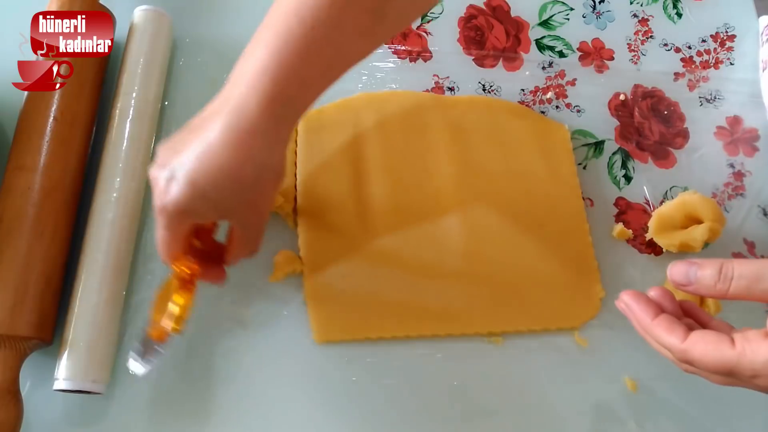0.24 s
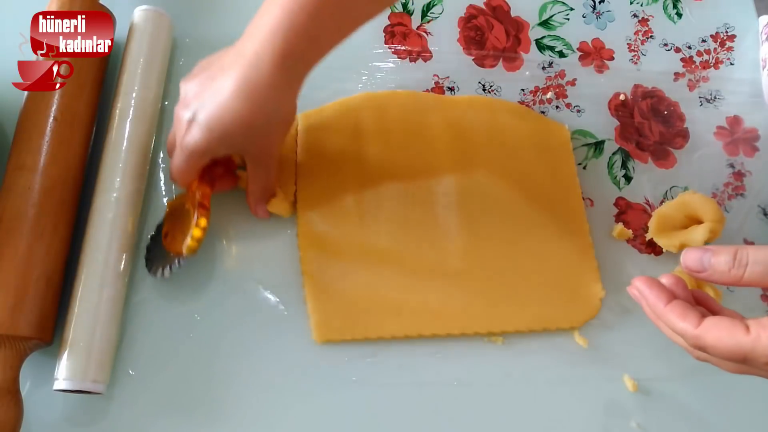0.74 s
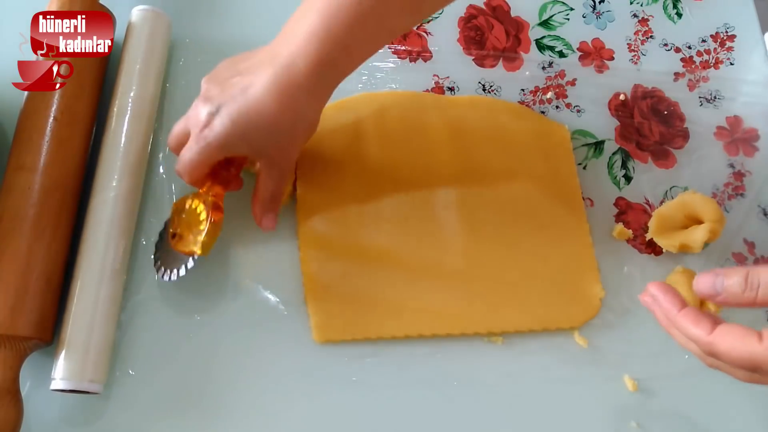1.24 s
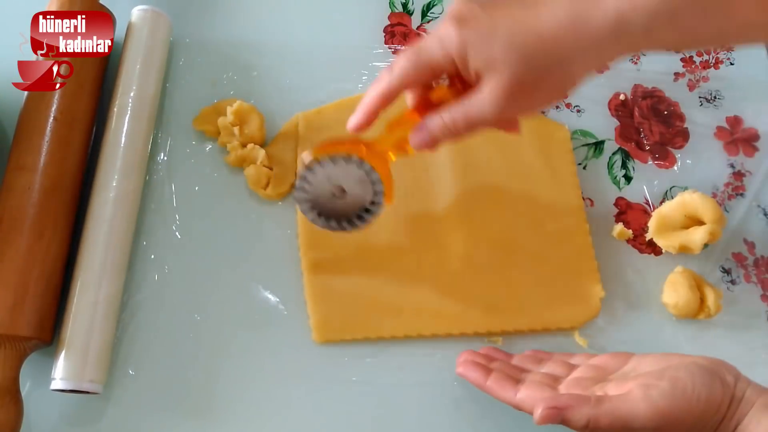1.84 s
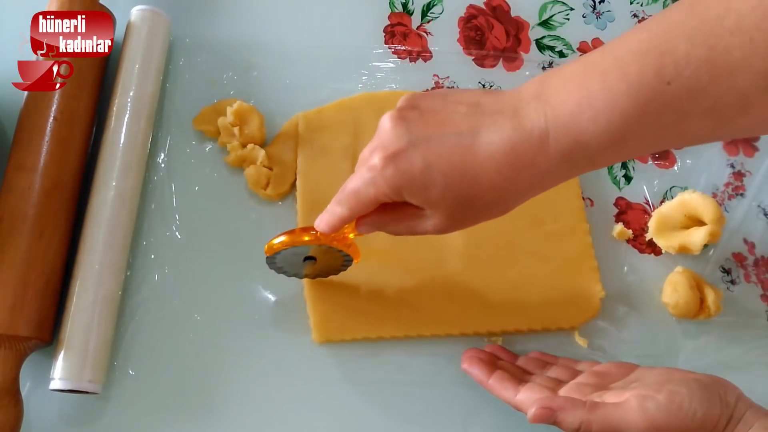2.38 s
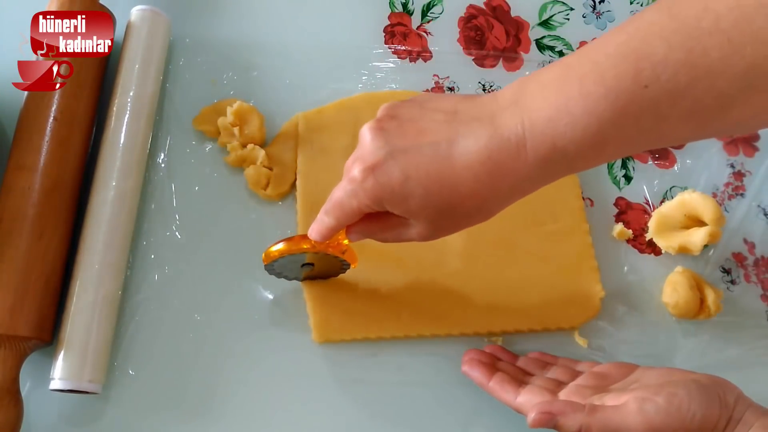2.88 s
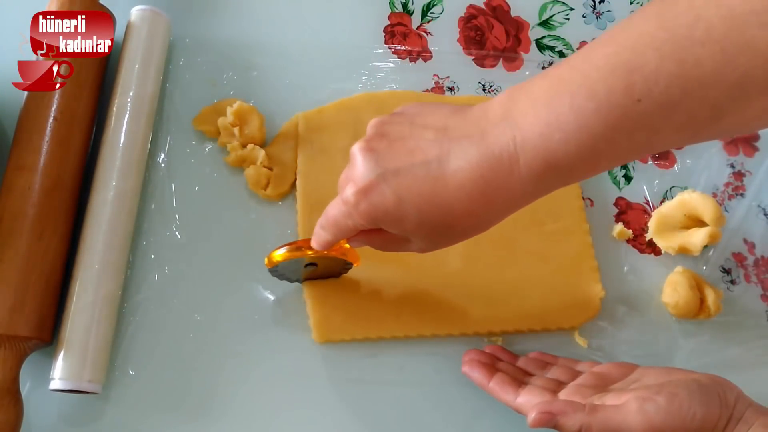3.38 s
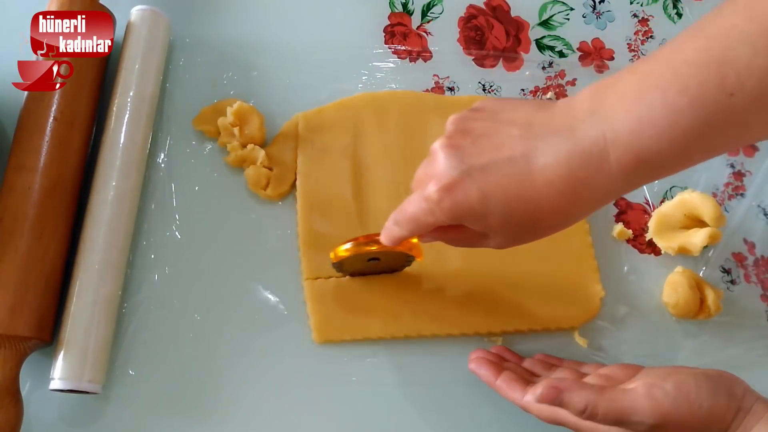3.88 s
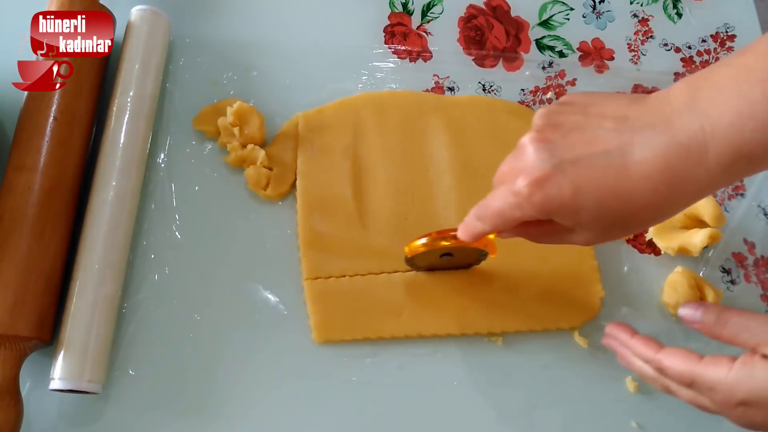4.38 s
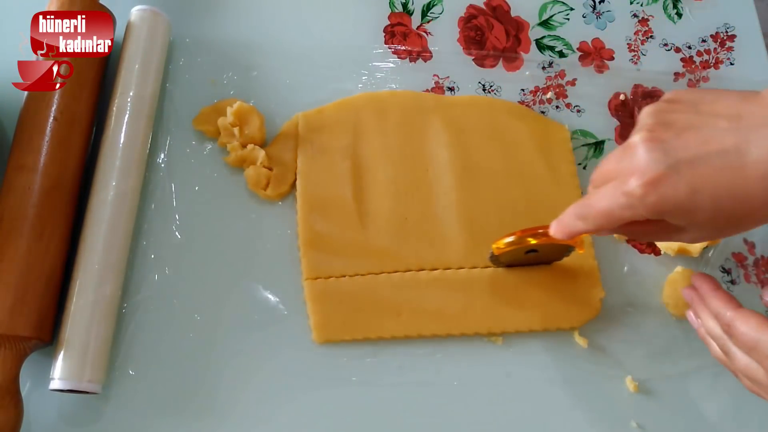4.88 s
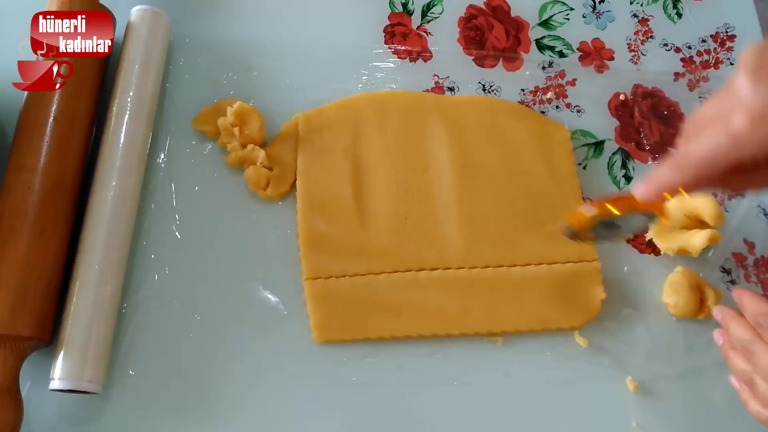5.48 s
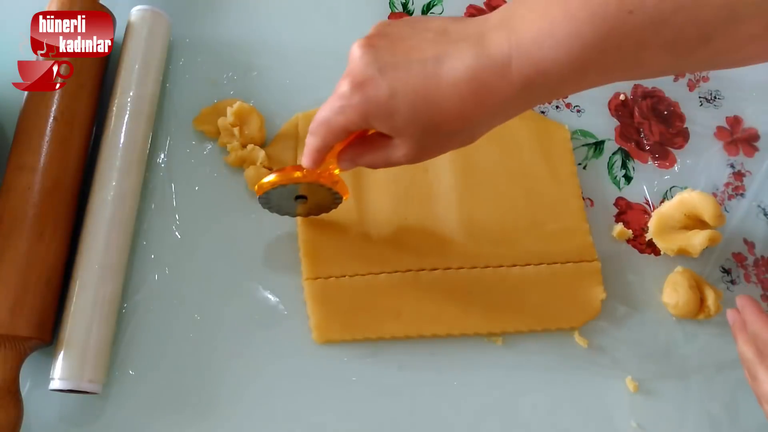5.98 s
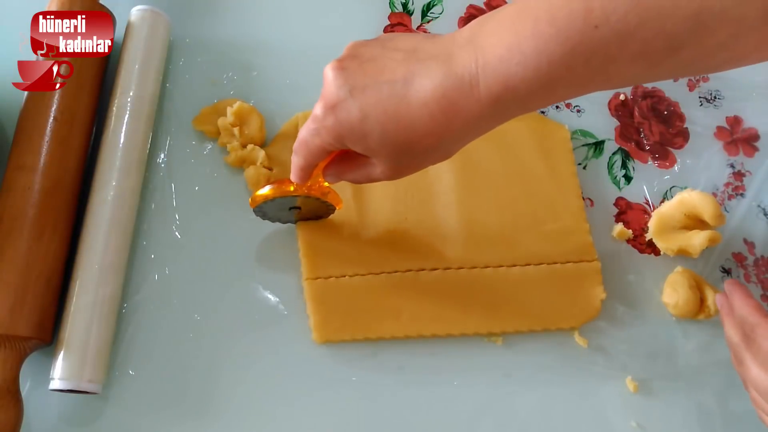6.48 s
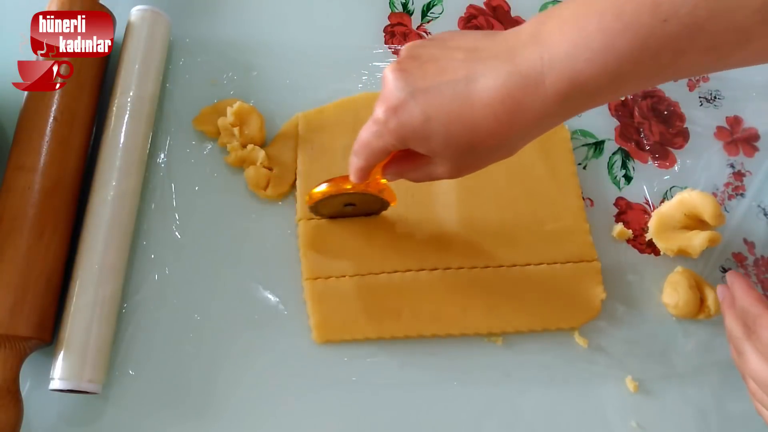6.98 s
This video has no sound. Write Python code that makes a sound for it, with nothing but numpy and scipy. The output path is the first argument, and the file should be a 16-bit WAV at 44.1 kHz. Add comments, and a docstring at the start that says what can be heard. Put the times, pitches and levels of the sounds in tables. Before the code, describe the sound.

Close stereo microphones in a small tiled kitchen, with short bright echoes, steady soft hiss and faint distant rumble. At 0 s a rapid burst of hard plastic and steel clacks hits a glass table, with a low thud dying away and a tick at 0.15. From 0.4 to 1.3 come soft table bumps, small loose-wheel rattles and faint grainy finger sweeps over dough, with a firmer clack at 1.29. Loud ringing clacks strike at 1.5 and 1.98, with lesser ones between; a very faint thin metallic ring lingers until 2.7. Light ticks fall at 2.1, 2.8 and 3.16. From about 3.45 to 5.4 the wheel rolls through dough in quiet, pulsing rough squeaks and soft hiss. At 5.55 a stronger short scrape joins a cluster of crisp ticks, more at 5.77. Sparse faint ticks follow, then barely audible rolling from 6.9 to the end.

```python
"""Pastry wheel on a glass table

A pastry cutter with a loose fluted steel wheel and a plastic handle is handled over a glass kitchen table.
Clacks and ticks are short bursts of noise through the handle's pitches; wheel and table ring as fading sines.
Fingers sweep dough aside and the wheel rolls flute by flute through the sheet: filtered, swelling noise.
A small tiled room, faint tones, a distant rumble and a steady background hiss surround it."""
import sys
import numpy as np
from scipy import signal
from scipy.fft import rfft, irfft, next_fast_len
from scipy.io import wavfile
from scipy.ndimage import uniform_filter1d

SR = 44100
rng = np.random.default_rng(int(sys.argv[2]) if len(sys.argv) > 2 else 0)


def materialize(psi):
    """Save the field psi as 16-bit PCM at rate SR to the path in sys.argv[1].

    A 1-D psi becomes a single channel; in a 2-D psi each row is a channel.
    """
    bounded = np.clip(np.atleast_2d(psi).T, -1, 1)
    quanta = np.round(bounded * 32767).astype(np.int16)
    wavfile.write(sys.argv[1], SR, quanta)


N = 319284
T = np.arange(N) / SR  # time of every sample, s


def undb(db):
    """Turn decibels into a plain multiplier."""
    return 10 ** (np.asarray(db, float) / 20)


def unit(x):
    """Scale to an average (rms) level of 1."""
    return x / np.sqrt(np.mean(x ** 2) + 1e-30)


def peak(x):
    """Scale so that the highest peak is 1."""
    return x / np.max(np.abs(x))


def band(x, lo_hz, hi_hz, order=2):
    """Keep the pitches between two limits (Butterworth band-pass along the last axis)."""
    limits = [lo_hz, min(hi_hz, .45 * SR)]
    return signal.sosfilt(signal.butter(order, limits, "band", fs=SR, output="sos"), x)


def ring(x, hz, t60):
    """One mode: a unit blow starts a unit sine that falls 60 dB in t60 seconds."""
    r = np.exp(-np.log(1000) / (t60 * SR))
    w = 2 * np.pi * hz / SR
    return signal.lfilter([0, np.sin(w)], [1, -2 * r * np.cos(w), r * r], x)


def colour(x, table, share=1):
    """Filter by (Hz, dB) points, with the dB multiplied by share."""
    hz, db = np.transpose(table)
    size = next_fast_len(N)
    f = np.maximum(np.arange(size // 2 + 1) * SR / size, 1)
    gain_db = share * np.interp(np.log(f), np.log(hz), db)
    return irfft(rfft(x, size) * undb(gain_db), size)[..., :N]


def walk(rate):
    """Wandering random values: each held 1 / rate s, then smoothed twice; spread near 1."""
    hold = int(SR / rate)
    steps = np.repeat(rng.standard_normal(N // hold + 1), hold)
    return 1.3 * uniform_filter1d(uniform_filter1d(steps, hold), hold)[:N]


def add(out, x, s):
    """Mix x in from time s, dropping whatever falls outside."""
    i = int(s * SR)
    x = x[..., max(-i, 0):N - i]
    out[..., max(i, 0):max(i, 0) + x.shape[-1]] += x


def curve(table, column, outside):
    """Join one column of a table by straight lines over time."""
    rows = np.array(table)
    return np.interp(T, rows[:, 0], rows[:, column], left=outside, right=outside)


# low band, before it wanders: first a blow's low tail dying away, later distant rumble:
# time_s, level_db
LOW_LEVEL = [(0.0, -46.5), (0.2, -66.5), (0.58, -63.5), (1.2, -69), (2.8, -74), (3.99, -67), (5.16, -70),
             (6.25, -72), (6.63, -68.5), (7.24, -67)]
# middle band: the first row is the blow's tail dying away, the later ones are distant rumble:
# centre_s, level_db, half_length_s
MID_SWELLS = [(0.0, -61, 0.13), (0.794, -72, 0.47), (2.156, -68, 0.28), (4.68, -65.5, 0.23),
              (5.595, -71.5, 0.36), (6.7, -72, 0.33)]
MID_FLOOR_DB = -91  # base level of the middle band between swells


def rumble():
    """A blow's low tail, then distant rumble: two wandering noise bands, partly shared by both ports."""
    shared, own = rng.standard_normal(N), rng.standard_normal((2, N))
    low = unit(band(shared + 1.2 * own, 34, 180))
    mid = unit(band(.3 * shared + own, 260, 440))
    mid = mid + .35 * unit(band(own, 450, 1000, order=1))
    low_db, mid_db = 1.5 * walk(8), 1.5 * walk(7)
    swells = undb(MID_FLOOR_DB)
    for s, db, half in MID_SWELLS:
        swells = swells + undb(db) * np.exp(-((T - s) / half) ** 2)
    return low * undb(curve(LOW_LEVEL, 1, None) + low_db) + mid * swells * undb(mid_db)


LEAD_IN_S, LEAD_IN_DB = 0.0065, -28  # a faint lead-in of noise before each knock


def knock(db, hz, dull_db, hollow_db, bright_db, ms, pan_db, snap=0):
    """A chatter of contacts sounds the plastic handle; both ports, with a faint lead-in of noise."""
    t = np.arange(2048) / SR - LEAD_IN_S  # 0 at the knock
    tau = np.clip(ms, .3, 20) / 1000
    after = np.maximum(t, 0)
    shape = (1 - np.exp(-after / (.5 * tau))) * np.exp(-after / tau)
    shape += undb(LEAD_IN_DB) * np.exp(-np.abs(t) / tau)
    noise = rng.standard_normal((4, len(t)))
    # reflections off the glass make the chatter differ between the ports
    chatter = (noise[0] + .7 * noise[1:3]) * undb(2 * noise[3]) * shape
    chatter[:, int(LEAD_IN_S * SR)] += snap  # first contact
    body = 0.58 * peak(band(chatter, hz - 350, hz + 350))
    body += 0.54 * peak(band(chatter, .85 * hz, 1.322 * hz))
    body += undb(dull_db) * peak(band(chatter, 290, 2700))
    body += undb(hollow_db) * peak(band(chatter, 2700, 3224))
    body += undb(bright_db) * peak(band(chatter, 6500, 13000, order=3))
    return undb(db + np.array([[pan_db], [-pan_db]]) / 2) * body


# wheel knocking axle and handle; the last three levels are relative to level_db:
# start_s, level_db, handle_pitch_hz, dull_part_db, ring_of_family_0_db, ring_of_family_1_db
CLACKS = [(0.0044, -16.5, 4670, -4.5, -30, -1.5), (0.0186, -15, 4540, -17, -46.5, -21.5),
          (0.0267, -18, 4170, -30.5, -28, -8), (0.0349, -30, 4200, 5, -21.5, -16),
          (0.5058, -39.5, 5100, -58, -18, -19), (0.633, -45.5, 5000, 7, -15, 0),
          (0.6875, -43, 5170, 3, -21.5, -9), (0.765, -47.5, 4240, -26, -35, -14),
          (0.847, -52, 4570, -26, -39, -2), (0.8661, -41.5, 4030, -5.5, -45, -17),
          (1.1036, -53, 5270, -10, -24.5, -15), (1.1292, -39, 4570, -34, -17, -12.5),
          (1.145, -42, 5600, -31, -16.5, -21), (1.193, -39, 5060, -14.5, -30, -12),
          (1.2875, -30, 4400, -16, -27.5, -19.5), (1.5033, -8.5, 4630, -29.5, -43.5, -15),
          (1.5104, -22.5, 5230, -1, -23.5, -31.5), (1.7454, -22, 4650, -13.5, -20.5, -14.5),
          (1.8284, -31, 4600, -16.5, -33, -18.5), (1.8795, -33.5, 5830, -15.5, -43.5, -22.5),
          (1.929, -39, 4780, -17.5, -45, -16), (1.9773, -9, 4960, -15, -28.5, -13.5),
          (2.0192, -28, 4600, -26.5, -28, -29.5)]
# modes of the steel wheel, one row per pitch below: base_level_db, fade_by_60_db_s, family (0 or 1)
WHEEL_MODES = [(-4.5, 0.22, 0), (-2.5, 0.3, 0), (-5, .1, 0), (-1, .15, 0), (-6, 0.12, 1), (-12, .14, 1),
               (-11, 0.12, 1), (-12, .1, 1), (-13, 0.11, 1), (-18, .15, 1)]
# pitches of those modes: pitch_hz
WHEEL_PITCHES = [5665, 5714, 6702, 4430, 8765, 8810, 12375, 13770, 9600, 10600]
CLACK_MS, CLACK_PAN_DB = 5, 0  # fade time of the chatter; left minus right
CLACK_HOLLOW_DB, CUPPED_HOLLOW_DB = -11, -3
CUPPED_UNTIL_S = 1.17  # until then the palm cups the handle
CLACK_BRIGHT_DB, BRIGHT_PER_RING = 1, 0.4  # the bright part grows with the ring of family 1
SNAP_AT_0_DB = 2  # first contact over the rest; grows with the force of the clack


def clacks():
    """Each clack sounds the handle and strikes the wheel, whose modes ring and flutter."""
    handle, blows = np.zeros((2, N)), np.zeros((2, 2, N))  # blows: family, port, time
    for s, db, hz, dull_db, *ring_db in CLACKS:
        bright_db = CLACK_BRIGHT_DB + BRIGHT_PER_RING * ring_db[1]
        hollow_db = CUPPED_HOLLOW_DB if s < CUPPED_UNTIL_S else CLACK_HOLLOW_DB
        snap = SNAP_AT_0_DB * undb(db)
        clack = knock(db, hz, dull_db, hollow_db, bright_db, CLACK_MS, CLACK_PAN_DB, snap)
        add(handle, clack, s - LEAD_IN_S)
        blow_db = db + np.add.outer(ring_db, [CLACK_PAN_DB / 2, -CLACK_PAN_DB / 2])
        add(blows, undb(blow_db)[..., None], s + CLACK_MS / 3000)
    # the wheel wobbles on its loose axle, so every mode flutters at each port
    wheel = 0
    for hz, (db, t60, family) in zip(WHEEL_PITCHES, WHEEL_MODES):
        flutter_db = 7.45 * np.array([walk(90), walk(90)])
        wheel = wheel + undb(db + flutter_db) * ring(blows[family], hz, t60)
    return handle + wheel


# how long the room echoes at each pitch: pitch_hz, fade_by_60_db_s
ROOM_FADE = [(300, 0.27), (1000, 0.32), (3000, 0.36), (5000, 0.3), (9000, 0.3), (14000, 0.076)]
ROOM_DB = -7.5


def room(x):
    """A noise tail that swells over a few ms, then dies band by band; each port has its own."""
    t = np.arange(int(.6 * SR)) / SR
    hz, t60 = np.transpose(ROOM_FADE)
    tail = 0
    for f in 150 * 2 ** np.arange(0, 7, .5):  # half-octave bands
        fade = np.exp(-np.log(1000) * t / np.interp(np.log(f), np.log(hz), t60))
        noise = rng.standard_normal((2, len(t)))
        tail = tail + band(noise, f / 2 ** .25, f * 2 ** .25) * fade
    tail *= 1 - np.exp(-(t / 0.0062) ** 2)
    tail /= np.sqrt(np.sum(tail ** 2, axis=1, keepdims=True))
    return undb(ROOM_DB) * signal.fftconvolve(x, tail, axes=1)[:, :N]


# hand on the table top: start_s, level_db, pitch_hz
BUMPS = [(0.019, -43, 196.4), (0.396, -42, 115), (0.41, -40, 102), (0.458, -41, 120), (0.509, -44.5, 133.3),
         (0.547, -42, 114.3), (0.629, -42, 67.8), (1.125, -44.5, 139.2), (1.149, -46, 132.8),
         (1.493, -50, 51.14), (1.98, -57, 64.6), (3.541, -58.5, 90), (4.129, -55, 90.4),
         (4.531, -54.5, 166.5), (5.437, -49.5, 122), (6.934, -53.5, 109), (7.088, -53.5, 107.7)]
BUMP_T60_S = .28  # time for the hum to fall 60 dB


def bumps():
    """A soft push sets the table top humming, with a leg mode at 67 Hz and two panel modes."""
    out = np.zeros(N)
    push = np.hanning(int(0.0044 * SR))
    push = np.pad(push / push.sum(), (0, SR - len(push)))
    frame = 0.35 * ring(push, 67, 1.0)  # leg
    frame += 0.48 * ring(push, 220, 0.14) + .25 * ring(push, 305, 0.37)  # panel
    for s, db, hz in BUMPS:
        add(out, undb(db) * (ring(push, hz, BUMP_T60_S) + frame), s)
    return band(out, 50, 2000)


# short ticks of the handle: start_s, level_db, handle_pitch_hz,
# bright_part_db (relative to level_db)
TICKS = [(0.1444, -34.5, 4430, -10), (0.9704, -44, 4700, -5.5), (1.034, -51, 4500, -2),
         (2.1015, -34, 4700, -11), (2.227, -45.5, 4620, -16), (2.6382, -65.5, 4830, -4.5),
         (2.6784, -59, 5440, -9), (2.7225, -58, 4720, -9), (2.7822, -36, 5410, -12),
         (3.1628, -37.5, 4730, -7), (4.0961, -45, 4860, -1.5), (5.5553, -34, 4840, -14),
         (5.5633, -32.5, 5060, -1), (5.5698, -28, 4900, -15), (5.5936, -33.5, 4870, -17),
         (5.708, -55, 4280, 5), (5.7672, -34, 4970, 1.5), (5.787, -42, 5100, -13),
         (5.919, -41.5, 4340, -4.5), (6.1894, -49.5, 4510, -13), (6.2493, -40.5, 4200, -7.5),
         (6.8012, -52.5, 4500, -1), (7.0594, -51.5, 4400, 4)]
TICK_MS, TICK_SNAP = 2.4, 0.84  # fade time of the chatter; size of the first contact
TICK_DULL_DB, TICK_HOLLOW_DB, TICK_PAN_DB = -14.5, -12.5, 2  # pan: left minus right


def ticks():
    """Ticks sound the handle with short chatters and leave the wheel still."""
    out = np.zeros((2, N))
    for s, db, hz, bright_db in TICKS:
        tick = knock(db, hz, TICK_DULL_DB, TICK_HOLLOW_DB, bright_db, TICK_MS, TICK_PAN_DB, TICK_SNAP)
        add(out, tick, s - LEAD_IN_S)
    return out


# a faint tone near 1 kHz comes and goes: start_s, pitch_hz, level_db, length_s
TONES = [(.5, 965, -73, .26), (1.24, 1000, -73, .27)]


def tones():
    """Faint steady sines with soft starts and ends."""
    out = np.zeros(N)
    for s, hz, db, length in TONES:
        count = int(length * SR)
        sine = np.sin(2 * np.pi * hz * T[:count])
        add(out, undb(db) * signal.windows.tukey(count, .4) * sine, s)
    return out


# fingers sweeping dough scraps: time_s, level_db, dull_part_db (relative to level_db)
SWEEP = [(0.55, -71, -10), (0.696, -71, 14), (1.082, -63, -23), (1.13, -67.5, 22), (1.226, -72, -8.5),
         (1.4, -77, 4)]


def sweep():
    """Fingers and dough stick and slip on the glass: noise with a grainy, jumping level."""
    db = curve(SWEEP, 1, -120)
    grain = rng.standard_normal((2, N)) * undb(2 * walk(40) + 3 * walk(400))
    bright = unit(band(grain, 6000, 14300)) + .5 * unit(band(grain, 3900, 5300))
    dull = undb(curve(SWEEP, 2, 0)) * unit(band(grain, 150, 2849, order=1))
    return undb(db) * (bright + dull)


# blows on the lifted wheel: start_s, level_db
FREE_BLOWS = [(1.747, -70), (1.978, -59)]
# slow modes of the wheel held clear of the table, one row per pitch below: level_db, fade_by_60_db_s
FREE_MODES = [(5, 2.5), (2, 2.5), (5, 1.1), (1, .9), (7, .3)]
# pitches of those modes; the close pair beats: pitch_hz
FREE_PITCHES = [2190, 2192.1, 3758, 10610, 3200]
ON_DOUGH_S = 2.69  # the wheel meets the dough


def free_ring():
    """Long thin ring of the lifted wheel, silent once it meets the dough; the pair starts in opposition."""
    blows = np.zeros(N)
    for s, db in FREE_BLOWS:
        add(blows, undb([db]), s)
    stop = np.clip((ON_DOUGH_S - T) / 0.062, 0, 1)
    modes = 0
    for k, (hz, (db, t60)) in enumerate(zip(FREE_PITCHES, FREE_MODES)):
        modes = modes + (-1) ** k * undb(db) * ring(blows, hz, t60)  # signs alternate
    return stop * modes


# times of flutes rolled, plus one scrape at 5.549 s as the wheel lifts off: time_s, swells_so_far
ROLLED = [(3.459, 0), (3.722, 2), (4.105, 6), (4.481, 10), (4.596, 11), (5.16, 18), (5.424, 22),
          (5.549, 23), (6.939, 24), (7.089, 25), (7.176, 26)]
# loudness of the swells, before scatter: time_s, squeak_level_db, hiss_level_db
LOAD = [(3.46, -68, -74), (3.8, -61, -75.5), (4.1, -61, -67), (4.48, -66.5, -72), (4.67, -63, -71),
        (5.08, -64, -74.5), (5.35, -55.5, -75), (5.43, -62.5, -82), (5.54, -52, -64), (6.94, -81.5, -80),
        (7.1, -79, -75.5)]
# squeak resonances of the axle: pitch_hz, width_hz, level_db
AXLE = [(2420, 540, -6.5), (4995, 190, 5), (4700, 2900, -3.5), (8600, 1300, -3)]
SWELL_S, SWELL_LEAD_S = 0.13, 0.042  # length of one swell; its start before the listed time
SWELL_SCATTER_DB = 2.15  # random spread from swell to swell


def rolling():
    """Each flute, and the lift-off scrape, swells a rough axle squeak and a hiss of parting dough."""
    squeak, hiss = np.zeros(N), np.zeros(N)
    when, passed = np.transpose(ROLLED)
    times = np.interp(np.arange(passed[-1] + 1), passed, when)
    scatter_db = SWELL_SCATTER_DB * rng.standard_normal((len(times), 2))
    squeak_db, hiss_db = curve(LOAD, 1, None), curve(LOAD, 2, None)
    swell = np.hanning(int(SWELL_S * SR)) ** 1.14
    for s, (a_db, b_db) in zip(times, scatter_db):
        i = int(s * SR)
        add(squeak, undb(squeak_db[i] + a_db) * swell, s - SWELL_LEAD_S)
        add(hiss, undb(hiss_db[i] + b_db) * swell, s - SWELL_LEAD_S)
    slip = rng.standard_normal((2, N)) * undb(0.97 * walk(55) + 2.04 * walk(500))
    axle = 0
    for hz, width, db in AXLE:
        axle = axle + undb(db) * unit(band(slip, hz - width / 2, hz + width / 2, order=1))
    noise = rng.standard_normal((2, N))
    parting = unit(band(noise, 5850, 15000, order=3)) + .5 * unit(band(noise, 10200, 11360))
    return squeak * unit(axle) + hiss * parting


TICK_ROOM_DB = -0.5  # room share of the ticks, almost the same as for other sounds


def scene():
    """Cutter and hands in the room, over the low bands."""
    open_air = clacks() + rolling() + sweep()
    handle_ticks = ticks()
    walls = room(open_air + undb(TICK_ROOM_DB) * handle_ticks)
    return open_air + handle_ticks + walls + free_ring() + bumps() + tones() + rumble()


# tone of the left port against the right, before each port takes its share: pitch_hz, tilt_db
PORT_TILT = [(100, 4), (1500, 3.5), (4500, 3.5), (7500, -4.5), (12000, -4.5)]
# shape of the steady background hiss, which ends near 14.5 kHz: pitch_hz, relative_level_per_hz_db
HISS_SHAPE = [(150, -16.5), (300, -1), (600, -3.5), (1200, -9), (2500, -10), (5000, -15), (9000, -12),
              (14000, -14.5), (14500, -42.5)]
HISS_DB = -70  # overall, both ports
LEFT_LAG_S, TOP_HZ = .0002, 15900  # delay of the left port; highest pitch kept


def record(dry):
    """Two microphone ports: the left hears later, fuller and duller; each has its own background hiss."""
    left = np.pad(colour(dry[0], PORT_TILT, 0.78), (int(LEFT_LAG_S * SR), 0))[:N]
    right = colour(dry[1], PORT_TILT, -0.91)
    hiss = unit(colour(rng.standard_normal((2, N)), HISS_SHAPE))
    hiss = hiss * undb(HISS_DB + np.array([[.7], [-.7]]))
    steep_cut = signal.ellip(10, .2, 80, TOP_HZ, fs=SR, output="sos")
    return signal.sosfilt(steep_cut, np.array([left, right]) + hiss)


dry = scene()
out = record(dry)
materialize(out)
```